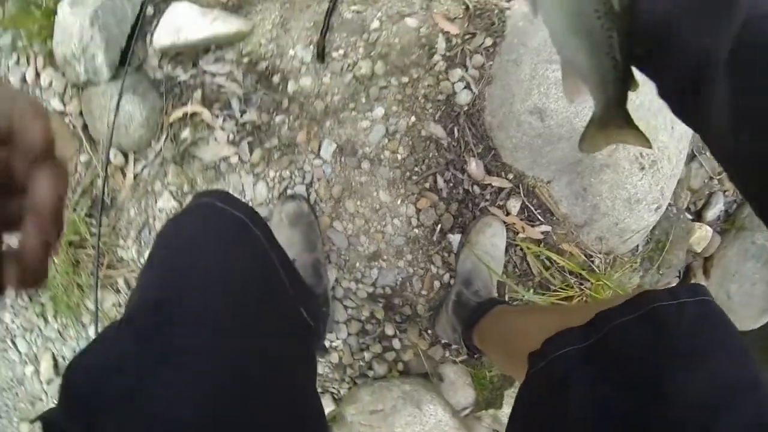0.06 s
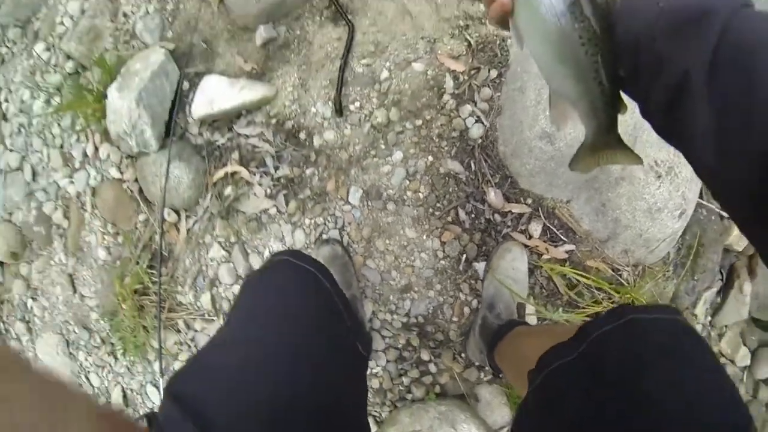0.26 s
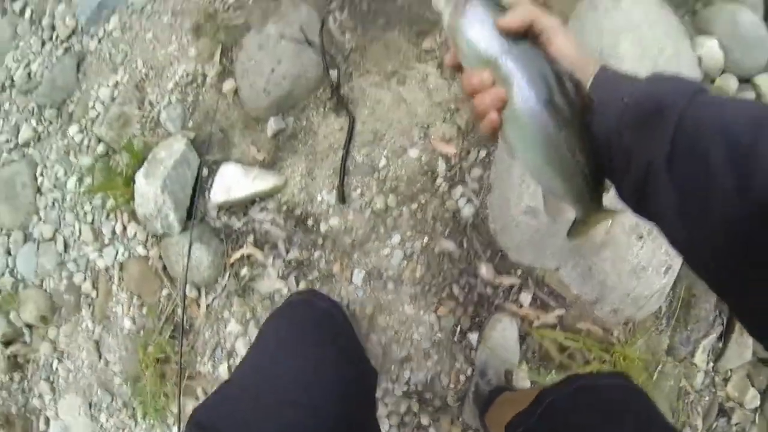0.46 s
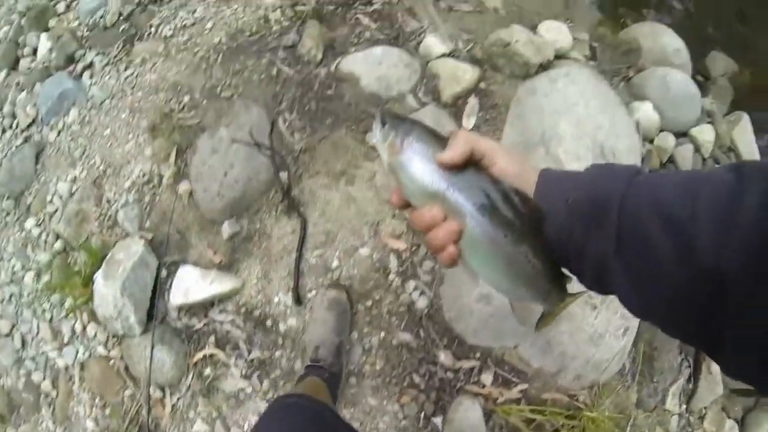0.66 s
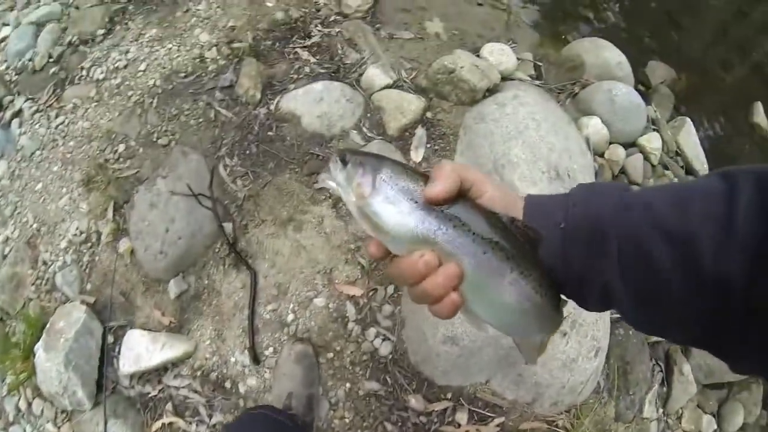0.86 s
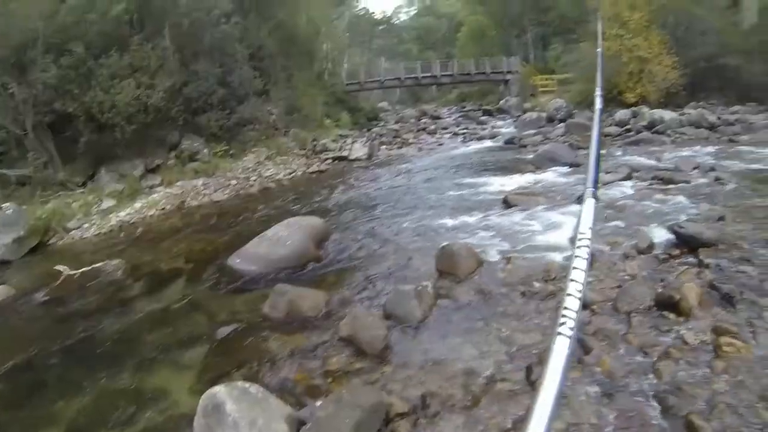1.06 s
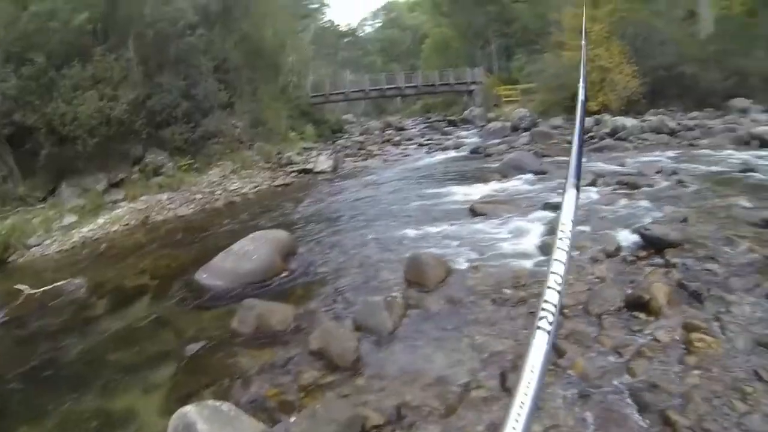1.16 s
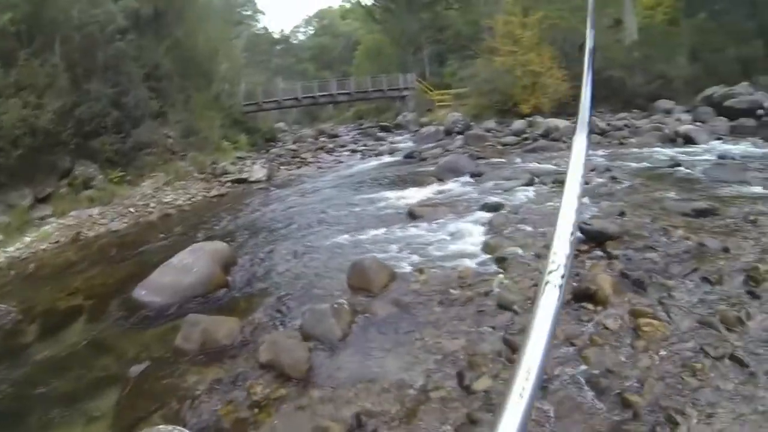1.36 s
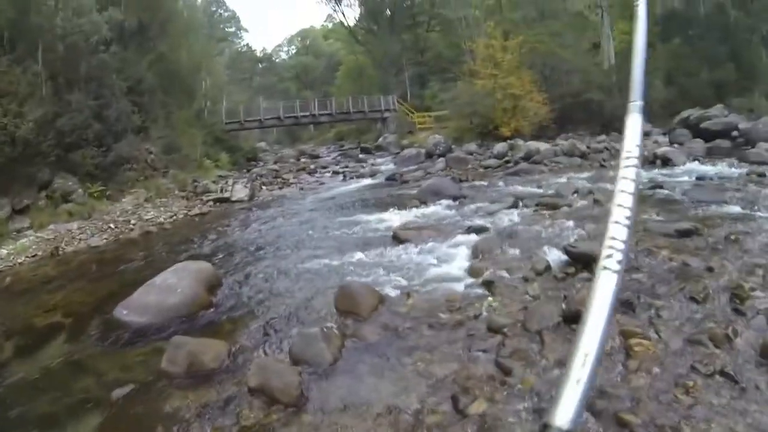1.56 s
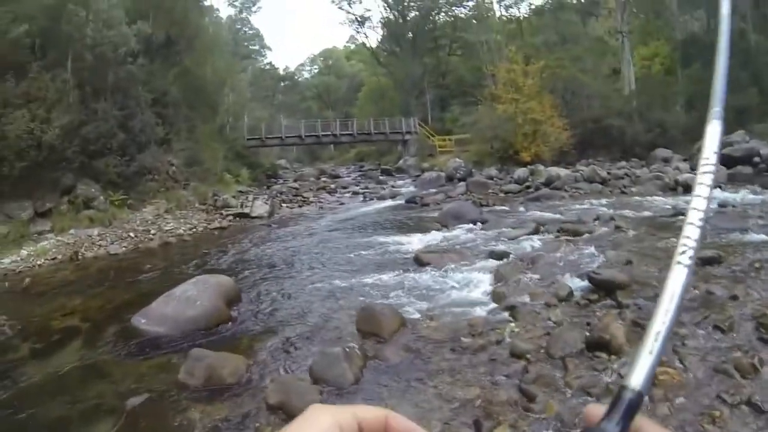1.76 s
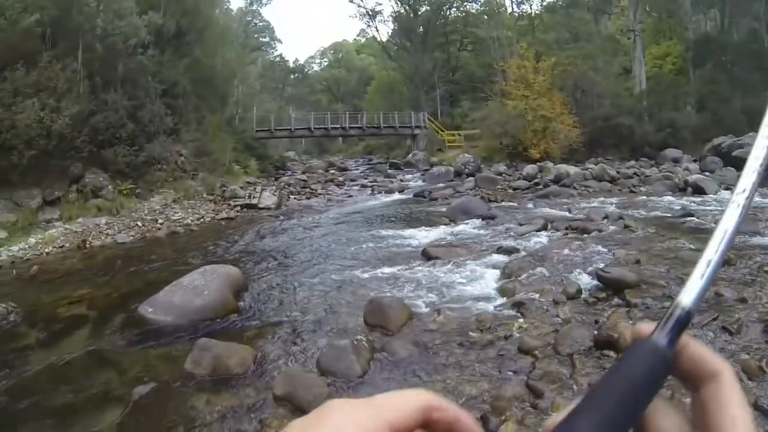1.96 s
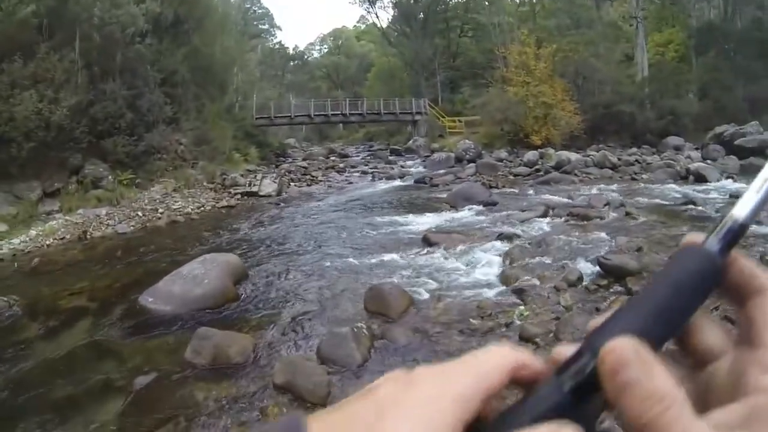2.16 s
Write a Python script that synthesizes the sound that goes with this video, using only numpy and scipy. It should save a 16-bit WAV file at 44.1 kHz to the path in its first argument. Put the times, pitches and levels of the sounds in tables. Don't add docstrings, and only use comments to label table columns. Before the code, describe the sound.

Plastic casing knocks, scrapes and creaks over faint water, cutting suddenly to steady rocky rapids

```python
import sys
import numpy as np
from scipy import signal
from scipy.io import wavfile
from scipy.ndimage import uniform_filter1d

SR = 44100
rng = np.random.default_rng(int(sys.argv[2]) if len(sys.argv) > 2 else 0)


def volts_from_db(level):
    exponent = np.asarray(level, float) / 20
    return 10 ** exponent


def log_audio(samples):
    frames = np.atleast_2d(samples).T
    limited = np.clip(frames, -1, 1)
    pcm = np.round(limited * 32767).astype(np.int16)
    wavfile.write(sys.argv[1], SR, pcm)


N = 97020
T = np.arange(N) / SR
CUT_S = 0.9613

# f/Hz, width/Hz, level/dB
SHELL_RESONANCES = [(777, 60, 0), (1058, 43, -14.5), (1339, 91, -2.5), (1546, 384, 5), (2090, 230, -10),
                    (2917, 624, -5), (3500, 230, -13.5), (4900, 550, -16), (5750, 440, -23.5),
                    (10800, 280, -27), (13300, 1500, -29.5)]
# f/Hz, density/dB (per Hz)
RUSH_SPECTRUM = [(59, -36), (100, 3), (764, 2.5), (942, -29), (1590, 5), (2370, -23), (5370, -9.5),
                 (15000, -48.5)]
# t/s, level/dB
RIVER_LEVEL = [
    (0, -8),
    (.33, -9),
    (.8, -4),
    (.85, -8),
    (.955, -110),
    (.966, 0.5),
    (1.1, 1.45),
    (1.6, 1.5),
    (2.2, 0.5),
]
# t/s, level/dB
SWAY_LEVEL = [(0, -17), (.12, -43), (.22, -22.5), (.33, -30), (.42, -20.5), (.7, -19.5), (.9, -25.5),
              (.96, -47), (.97, -51), (1.07, -32.5), (1.3, -36), (1.5, -34), (1.9, -41.5), (2.12, -33),
              (2.2, -39)]
# t/s, length/s, f/Hz, width/Hz, level/dB
SQUEAKS = [(0.35, .024, 10400, 900, -53), (0.36, 0.031, 5540, 350, -40.5), (.36, 0.021, 3010, 590, -37),
           (.428, 0.013, 8400, 450, -50), (0.387, .08, 8500, 400, -57.5), (.51, .035, 8240, 500, -68),
           (0.504, 0.059, 5530, 300, -59), (0.566, 0.011, 6860, 300, -59), (0.594, 0.036, 6300, 300, -53),
           (.576, 0.045, 3200, 360, -51), (0.634, .025, 5400, 300, -61), (.38, 0.085, 12000, 3200, -59),
           (.595, 0.033, 10500, 1500, -65), (.595, .03, 4700, 1500, -51)]
# t/s, level/dB, dry scratch over dull rub/dB
RUB_LEVEL = [(.355, -53, 0), (.361, -36.5, 0), (.385, -37.5, 0), (.44, -36, 12), (.48, -44, -4),
             (.53, -34, -5.5), (.556, -42.5, -27), (.575, -37, -13), (.62, -37.5, 0), (.635, -43.5, -6.5),
             (.68, -53, -18), (.73, -47, -23), (.75, -46, -28), (.78, -39, -32), (.82, -66, -22),
             (.85, -69, -29), (.9, -57, -4.5), (.95, -62.5, 0)]
# t/s, strength/dB, length/s, push direction (signed factor)
JOLTS = [(0.362, -15.5, 0.0052, -0.82), (0.371, -14, 0.032, 0.78), (0.401, -6, 0.025, -0.88),
         (0.4012, -17.5, 0.0048, -1.4), (0.426, -9, 0.054, 0.98), (0.454, -8.5, 0.036, -1.36),
         (0.495, -14.5, 0.035, 1), (.4985, -15, 0.0037, -1.04), (0.45, -21, 0.0038, -1),
         (.534, -16.5, 0.01, 0.81), (0.5349, -13.5, 0.0051, 0.93), (0.542, -22, 0.0056, 1),
         (0.561, -12.5, 0.035, -1.4), (.565, -21, 0.0064, -0.93), (0.578, -10.5, 0.029, 0.88),
         (0.6, -16, 0.041, 0.51), (.6255, -6.5, 0.017, -1.24), (0.668, -9.5, 0.025, 1),
         (0.704, -17, 0.016, -1.03), (0.717, -22, 0.01, -1), (0.735, -19.5, 0.006, -1),
         (0.747, -13.5, 0.0064, -1.12), (0.755, -17.5, 0.025, 0.91), (0.773, -25, 0.037, 0.63),
         (0.778, -14.5, 0.015, 1), (0.7942, -16.5, 0.0012, 1), (.799, -15, 0.0053, -0.92),
         (0.8305, -8.5, 0.002, -1.11), (0.838, -7.5, 0.0088, -0.67), (0.847, -8, 0.032, -1.04),
         (0.866, -21, 0.0035, -1.1), (0.893, -13, 0.027, 0.88), (0.937, -15, 0.026, 0.82),
         (0.953, -9, .02, -1.32), (0.961, -13, 0.011, -0.94)]
# f/Hz, level/dB, time to fall 60 dB/s
HOUSING_MODES = [(524, -13, 0.011), (763, -4.5, 0.012), (1130, -7, 0.013), (1500, -8.5, 0.0051),
                 (1640, 9, 0.011), (2196, -6, 0.016), (2610, -6.5, 0.011), (3340, -17, 0.0073),
                 (4390, -14, 0.0038), (5500, -9, 0.0035), (6760, -8.5, 0.0044), (8000, -22, 0.008),
                 (10450, -15, 0.0019), (13100, -13, 0.0009)]
# t/s, peak level/dB, brightness/Hz, contact/s, main mode f/Hz as the grip bends the wall
KNOCKS = [(.3935, -23, 2500, 0.0019, 1750), (0.3987, -19, 1860, 0.0017, 1670),
          (0.45, -18.5, 2020, 0.0025, 1396), (.4535, -24, 2010, .003, 1400),
          (0.4979, -8.5, 1370, 0.0012, 1550), (0.562, -34, 2980, 0.0017, 1700),
          (.6175, -22, 1300, 0.0028, 1530), (0.6405, -25, 2000, 0.0014, 1650),
          (0.6772, -30, 1500, 0.0018, 1630), (0.6895, -23.5, 2000, 0.0034, 1560),
          (.6955, -18.5, 2470, 0.0016, 1740), (0.6972, -16.5, 2520, 0.00085, 1580),
          (0.7138, -27, 3500, 0.0011, 1590), (.7152, -25, 2000, .002, 1600),
          (.727, -37, 1800, 0.0029, 1570), (.736, -16.5, 1600, 0.001, 1620),
          (0.7387, -11, 2900, 0.0019, 1636), (.7405, -18, 4000, .001, 1580),
          (0.7587, -15.5, 2450, 0.0035, 1710), (0.7609, -10.5, 3500, 0.0008, 1750),
          (0.7633, -7, 3300, 0.0025, 1620), (.767, -22.5, 2500, .003, 1740),
          (.7763, -19.5, 2600, 0.00087, 1450), (.781, -34, 1490, .001, 1470),
          (0.7929, -18, 2220, 0.0013, 1570), (.797, -34, 2500, .001, 1920),
          (0.8285, -38.5, 2520, 0.002, 2000), (.832, -39, 3500, 0.0009, 2300),
          (.8345, -27.5, 690, 0.00087, 576), (.84, -50, 3000, 0.0022, 2500),
          (0.8671, -34.5, 2540, 0.0013, 1520), (0.953, -34, 3900, 0.0013, 1610)]
# f/Hz, level/dB, time to fall 60 dB/s
EDGE_MODES = [(792, 0.5, 0.017), (1250, -3, 0.0064), (1660, 7.5, 0.0076), (2110, 5, 0.011),
              (2774, 9.5, 0.017), (3300, -28, 0.014), (4550, -6, .008), (5130, -0.5, 0.0099),
              (6800, -13, .015), (7960, -23, .008), (10300, -14, 0.0031)]
# t/s, peak level/dB, brightness/Hz, contact/s, main mode f/Hz
NAIL_TAPS = [
    (0.5732, -14.5, 4140, 0.002, 1800),
    (0.5941, -13, 4340, 0.0023, 1850),
    (0.6092, -11, 4500, 0.0019, 1680),
    (.612, -23, 3000, .003, 1780),
]
# t/s, step level/dB
SLIPS = [(.584, -38), (.651, -37), (.656, -39), (.7485, -36), (.774, -34), (.7843, -31), (.7892, -32),
         (.7983, -32), (.8038, -31), (.8077, -32), (.8113, -28), (.8152, -31), (.8197, -31), (.8477, -39),
         (.8643, -37), (.870, -38), (.8736, -38), (.8793, -39), (.9357, -39), (.9448, -39)]
# t/s, strength/dB, length/s, push direction (signed factor)
BUMPS = [
    (1.166, -35.5, 0.0043, 1),
    (1.33, -35.5, 0.0039, 1),
]
# t/s, f/Hz, level/dB
DRIPS = [
    (1.33, 5020, -50),
    (1.806, 4710, -49),
]

BUBBLES_PER_S, BUBBLE_SPREAD_DB, BUBBLE_CYCLES = 1500, 3, 2.7
BUBBLE_DB, RUSH_DB, SHELL_DB = -7, -54.5, -49
SWELL_DB, FLICKER_DB = 0.3, 1
SHELL_NOTCH_HZ, SHELL_NOTCH = 1900, 0.3
SWAY_HZ, SWAY_WIDTH_HZ = 9.6, 7.13
FLUTTER_HZ, FLUTTER_DB, FLUTTER_FLOOR_DB = 62.4, -24, -67
FLUTTER_FOLLOWS, FLUTTER_WALK_DB = 0.87, 1.5
HISS_DB, HISS_PEAK_HZ, HISS_PEAK_DB = -70, 11080, 5
RUB_GRIT_DB, RUB_TILT_DB = 2, -2.5
RUB_SOFT_HZ, RUB_DULL_HZ, RUB_TOP_HZ = 8900, 2600, 10500
REBOUND_HZ, REBOUND_WIDTH_HZ, REBOUND = 19.5, 22.6, 0.41
MAIN_HZ, BENDS_ABOVE_HZ, BENDS_BELOW_HZ = 1644, 1300, 1900
CONTACT_DB, LONGEST_CYCLES = -51, 48
RATTLE_DB, THUD_HZ, THUD_DB = -8, 261, -7.5
SLIP_RELAX_S, SLIP_SOFT_HZ, SLIP_GAIN_DB = 0.0025, 3800, 4
TOP_HZ, BAND_TOP_HZ = 14300, 16600


def level(x, db):
    return x * volts_from_db(db) / np.sqrt(np.mean(x ** 2))


def curve(table, col=1):
    rows = np.array(table, float)
    return np.interp(T, rows[:, 0], rows[:, col])


def band(x, hz, width_hz):
    return signal.lfilter(*signal.iirpeak(hz, hz / width_hz, fs=SR), x)


def soft(x, hz):
    return signal.lfilter(*signal.butter(2, np.clip(hz, 100, 15000), fs=SR), x)


def below(x, top_hz, stop_db):
    return signal.sosfilt(signal.ellip(8, 0.3, stop_db, top_hz, fs=SR, output="sos"), x)


def walk(rate_hz):
    hold = int(SR / rate_hz)
    steps = np.repeat(rng.standard_normal(N // hold + 1), hold)
    return 1.42 * uniform_filter1d(uniform_filter1d(steps, hold), hold)[:N]


def ring(push, tilt_db, modes=HOUSING_MODES, main_hz=MAIN_HZ):
    out = volts_from_db(CONTACT_DB + tilt_db) * band(push, 1900, 4600)
    for hz, db, t60 in modes:
        drive = push * volts_from_db(db + tilt_db * np.log2(hz / 2000))
        bent_hz = hz * main_hz / MAIN_HZ if BENDS_ABOVE_HZ < hz < BENDS_BELOW_HZ else hz
        width_hz = np.log(1000) / np.pi / min(t60, LONGEST_CYCLES / hz)
        out = out + band(drive, bent_hz, width_hz)
    return out


def bubbles():
    count, u = int(BUBBLES_PER_S * N / SR), np.arange(400) / SR
    at, pitch, size = rng.random((count, 3)).T
    hz = (600 * 2 ** (3.3 * pitch))[:, None]
    glide = 1 + 0.016 * hz * u / BUBBLE_CYCLES
    tone = np.sin(2 * np.pi * hz * u * glide) * np.exp(-2 * hz * u / BUBBLE_CYCLES)
    loudness = volts_from_db(-BUBBLE_SPREAD_DB * np.log(size + 0.02))[:, None]
    tone = tone * loudness * np.sqrt(hz) * np.hanning(800)[400:]
    where = (at * N).astype(int)[:, None] + np.arange(len(u))
    return np.bincount(where.ravel(), tone.ravel())[:N]


def river():
    water = rng.standard_normal(N) + level(bubbles(), BUBBLE_DB)
    swell, rows = walk(0.64), np.array(RUSH_SPECTRUM)

    def alive():
        return volts_from_db(SWELL_DB * swell + FLICKER_DB * walk(12))

    broad, shell = 0, 0
    for hz in 110 * 2 ** np.arange(0, 7.1, 0.5):
        db = np.interp(np.log(hz), np.log(rows[:, 0]), rows[:, 1])
        spray = band(band(rng.standard_normal(N), hz, hz / 2), hz, hz / 2)
        broad = broad + volts_from_db(db) * alive() * spray
    for hz, width_hz, db in SHELL_RESONANCES:
        wide = 1.45 * width_hz
        shell = shell + volts_from_db(db) * alive() * band(band(water, hz, wide), hz, wide)
    flow = level(broad, RUSH_DB) + level(shell, SHELL_DB)
    flow = flow - SHELL_NOTCH * band(flow, SHELL_NOTCH_HZ, 87)
    return flow * volts_from_db(curve(RIVER_LEVEL))


def sway():
    slow = rng.standard_normal(N)
    for _ in range(3):
        slow = band(slow, SWAY_HZ, 2 * SWAY_WIDTH_HZ)
    quick = band(band(rng.standard_normal(N), FLUTTER_HZ, 88), FLUTTER_HZ, 110)
    quick = level(quick * volts_from_db(FLUTTER_WALK_DB * walk(12.26)), 0)
    pressure_db = curve(SWAY_LEVEL)
    touch = FLUTTER_FOLLOWS * volts_from_db(curve(RUB_LEVEL)) * (T < CUT_S)
    flutter = volts_from_db(FLUTTER_FLOOR_DB) + touch + volts_from_db(pressure_db + FLUTTER_DB - 4)
    return level(slow, 0) * volts_from_db(pressure_db) + quick * flutter


def hiss():
    white = rng.standard_normal(N)
    ducked_db = HISS_DB - 10 * (abs(T - 0.9) < 0.06)
    port = volts_from_db(HISS_PEAK_DB) * band(white, HISS_PEAK_HZ, 770)
    return volts_from_db(ducked_db) * (soft(white, 7100) + port)


def squeaks():
    out = 0
    for start, length, hz, width_hz, db in SQUEAKS:
        u = np.clip((T - start) / length, 0, 1)
        whistle = band(band(rng.standard_normal(N), hz, width_hz), hz, 2 * width_hz)
        out = out + level(whistle, db) * np.sin(np.pi * u ** 0.42) ** 0.5
    return out


def rub():
    grit = rng.standard_normal(N) * volts_from_db(RUB_GRIT_DB * walk(250))
    body = level(ring(soft(grit, RUB_SOFT_HZ), RUB_TILT_DB), 0)
    dull = soft(soft(body, RUB_DULL_HZ), 2 * RUB_DULL_HZ)
    dry_share = volts_from_db(np.minimum(curve(RUB_LEVEL, col=2), 0))
    skin = soft(dry_share * body + (1 - dry_share) * dull, RUB_TOP_HZ)
    return skin * volts_from_db(curve(RUB_LEVEL)) * (T > RUB_LEVEL[0][0])


def jolts(table):
    push = 0
    for start, db, length, way in table:
        push = push + way * volts_from_db(db) * np.exp(-0.5 * ((T - start) / (length / 4)) ** 2)
    return push - REBOUND * band(push, REBOUND_HZ, REBOUND_WIDTH_HZ)


def knocks(table, modes):
    out, span = np.zeros(N), 2000
    u = np.arange(span) / SR
    thud = np.sin(2 * np.pi * THUD_HZ * u) * np.exp(-2 * THUD_HZ * u)
    for start, db, bright_hz, contact, main_hz in table:
        push = volts_from_db(RATTLE_DB) * rng.standard_normal(span) * np.exp(-(u / contact) ** 2)
        push[0] += 2.5
        ringing = ring(soft(push, bright_hz), 0, modes, main_hz)
        i = int(start * SR)
        out[i:i + span] += volts_from_db(db) * (ringing / np.abs(ringing).max() + volts_from_db(THUD_DB) * thud)
    return out


def creak():
    kick = np.zeros(N)
    for start, db in SLIPS:
        kick[int(start * SR)] = volts_from_db(db + SLIP_GAIN_DB)
    step = signal.lfilter([1], [1, -np.exp(-1 / (SLIP_RELAX_S * SR))], kick)
    return signal.lfilter(*signal.butter(1, SLIP_SOFT_HZ, fs=SR), step)


def drips():
    out = 0
    for start, hz, db in DRIPS:
        out = out + volts_from_db(db) * np.sin(2 * np.pi * hz * T) * np.exp(-((T - start) / 0.0016) ** 2)
    return out


def scene():
    air = river() + sway() + hiss() + jolts(BUMPS) + drips()
    hand = squeaks() + rub() + jolts(JOLTS) + knocks(KNOCKS, HOUSING_MODES)
    hand = hand + knocks(NAIL_TAPS, EDGE_MODES) + creak()
    return (below(air, TOP_HZ, 50) + below(hand, TOP_HZ, 50) * (T < CUT_S))[None]


def roll_off(x):
    return signal.sosfilt(signal.butter(12, 16820, fs=SR, output="sos"), x)


def record(dry):
    mix = below(dry, BAND_TOP_HZ, 60)
    return roll_off(mix)


dry = scene()
out = record(dry)
log_audio(out)
```